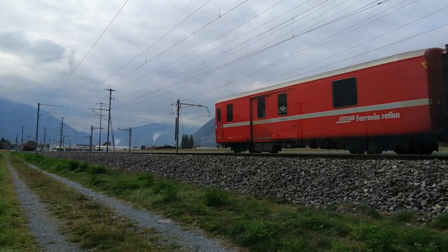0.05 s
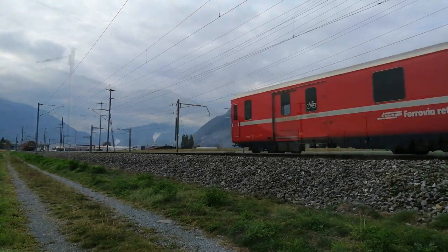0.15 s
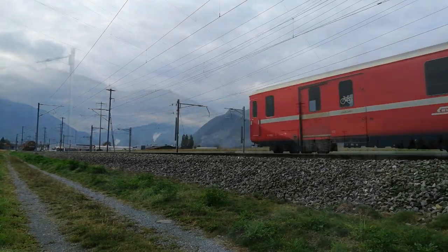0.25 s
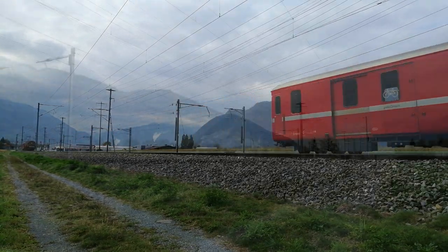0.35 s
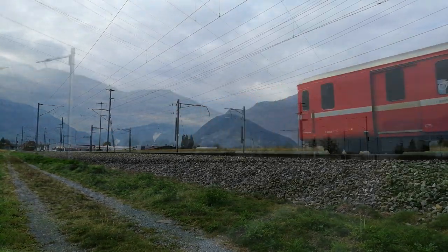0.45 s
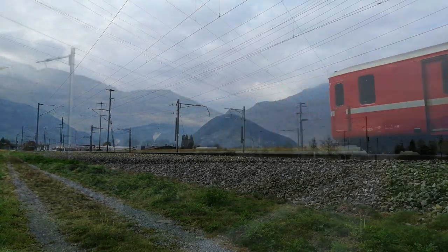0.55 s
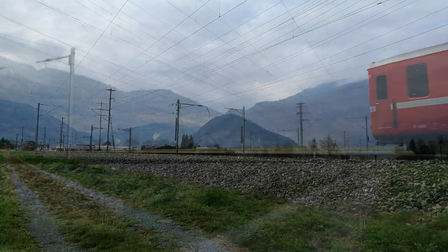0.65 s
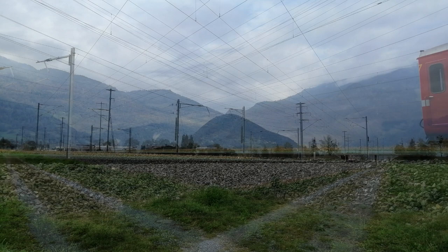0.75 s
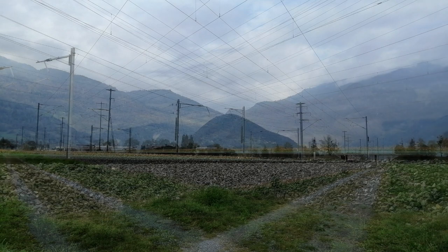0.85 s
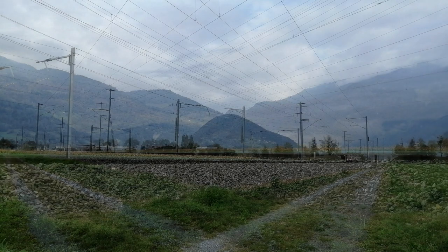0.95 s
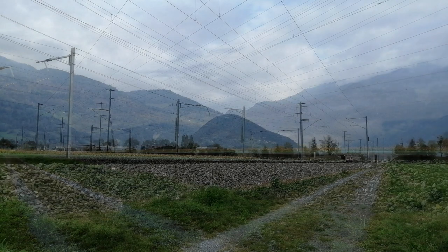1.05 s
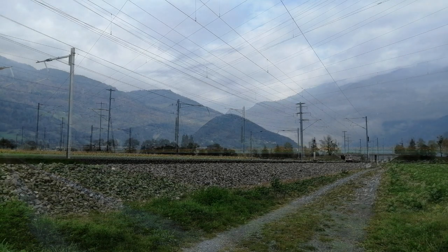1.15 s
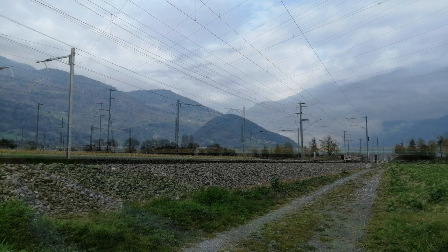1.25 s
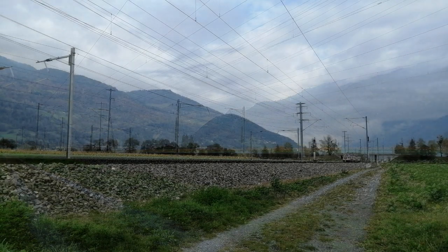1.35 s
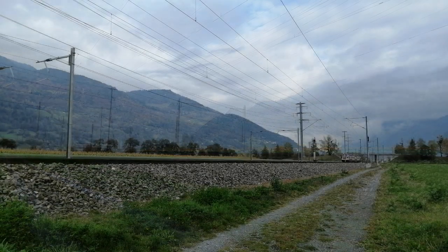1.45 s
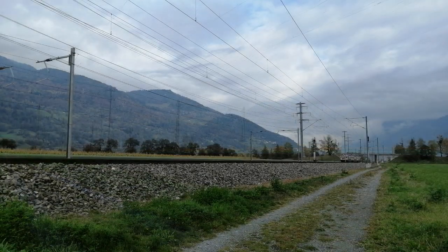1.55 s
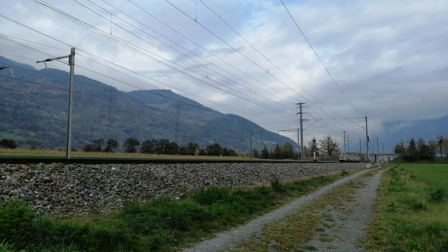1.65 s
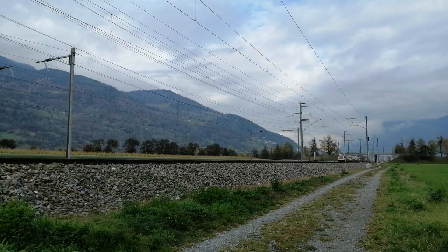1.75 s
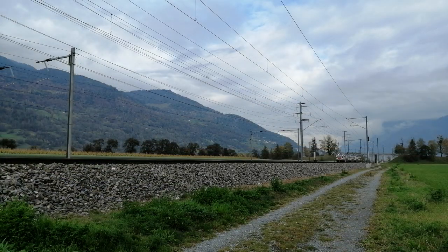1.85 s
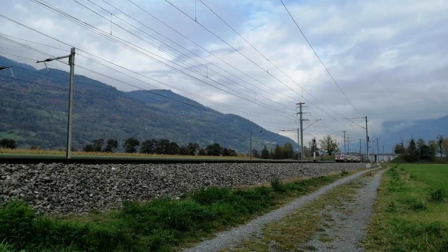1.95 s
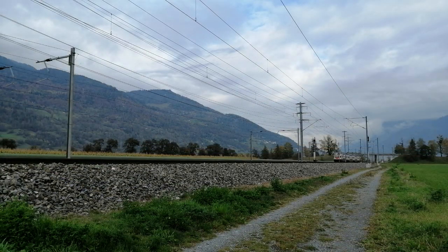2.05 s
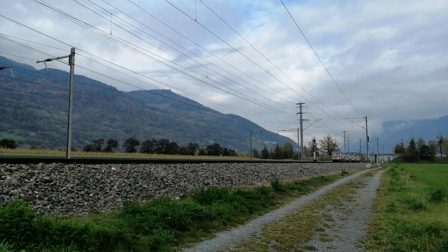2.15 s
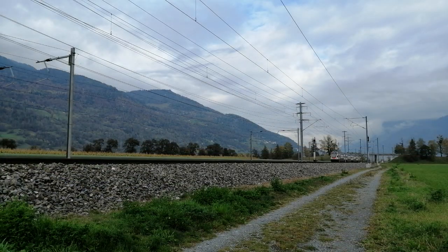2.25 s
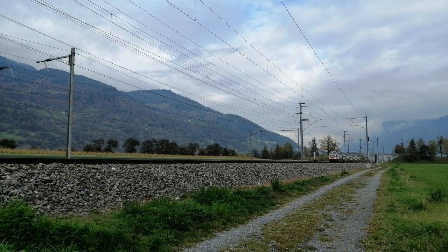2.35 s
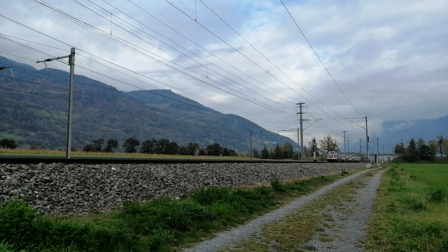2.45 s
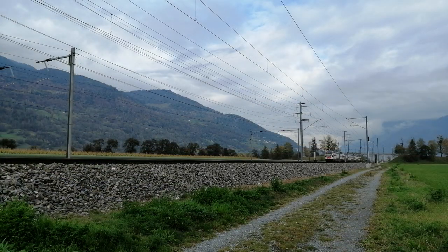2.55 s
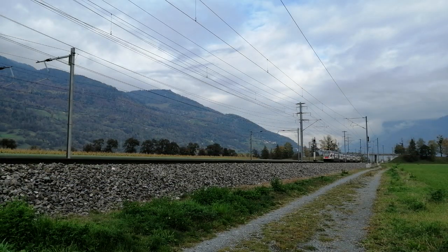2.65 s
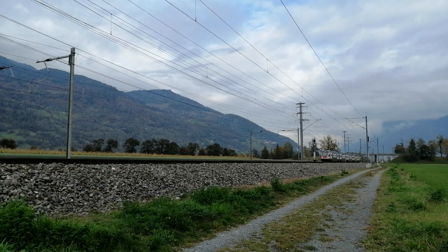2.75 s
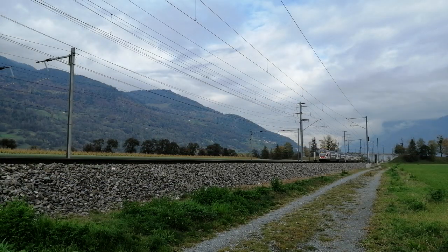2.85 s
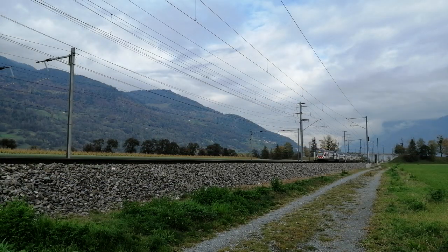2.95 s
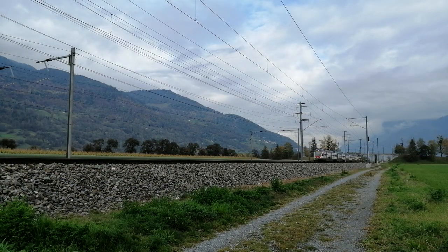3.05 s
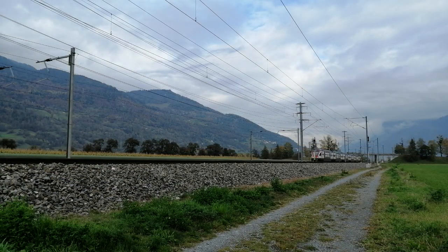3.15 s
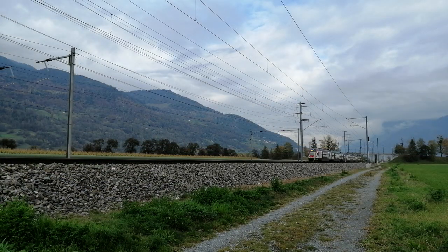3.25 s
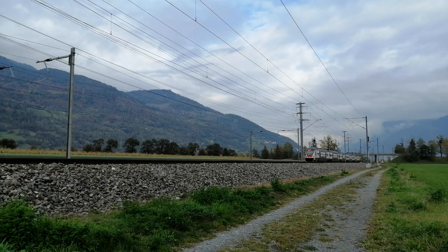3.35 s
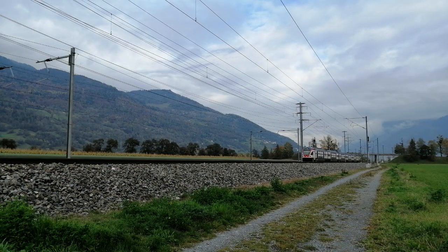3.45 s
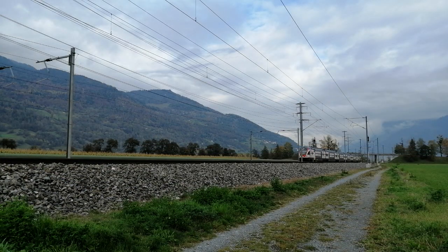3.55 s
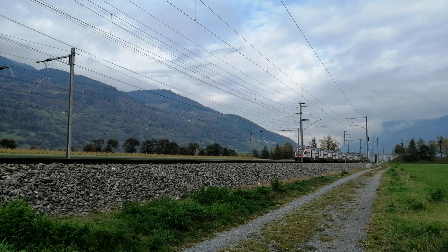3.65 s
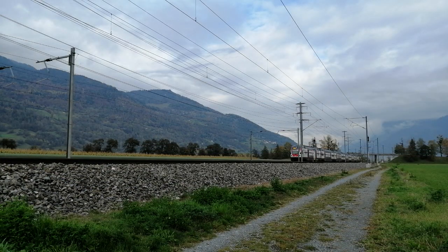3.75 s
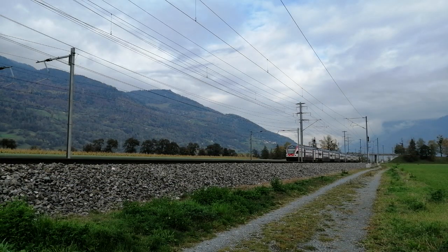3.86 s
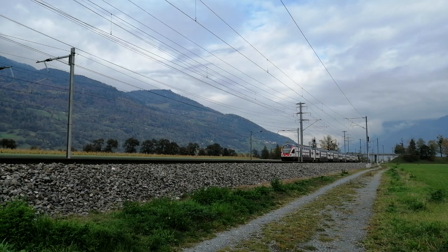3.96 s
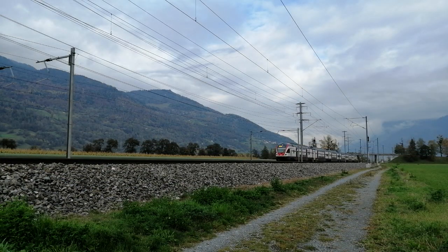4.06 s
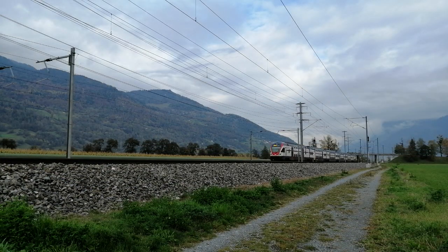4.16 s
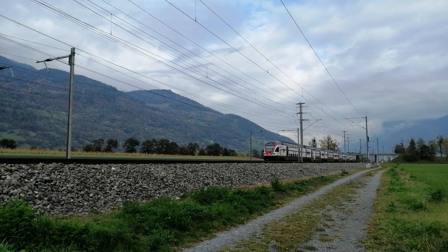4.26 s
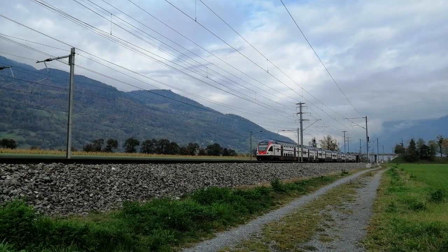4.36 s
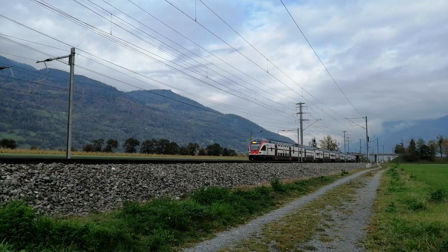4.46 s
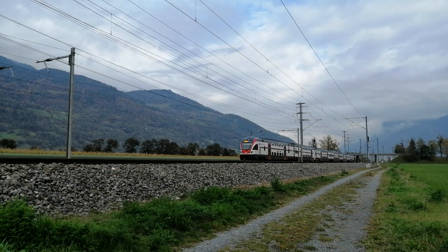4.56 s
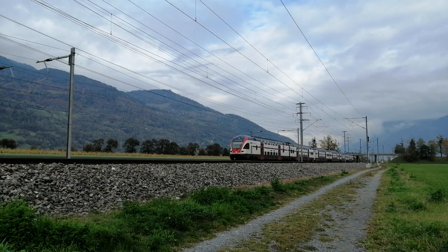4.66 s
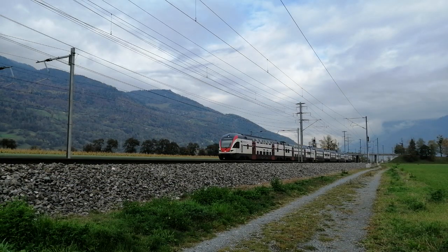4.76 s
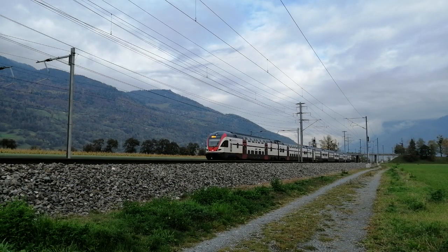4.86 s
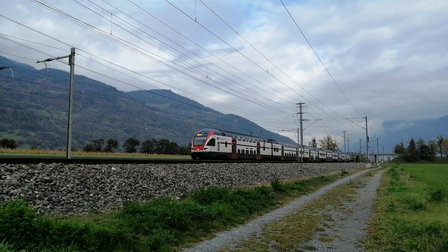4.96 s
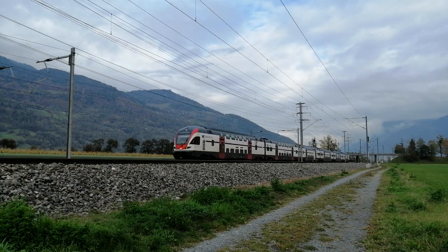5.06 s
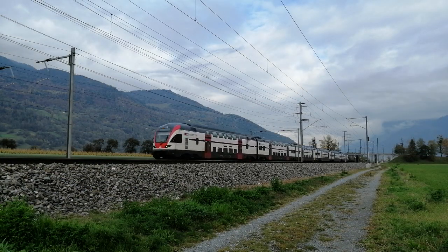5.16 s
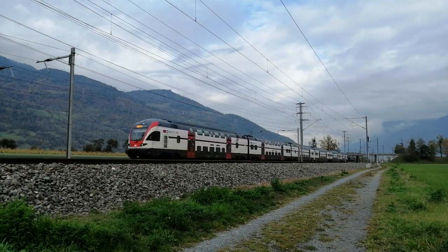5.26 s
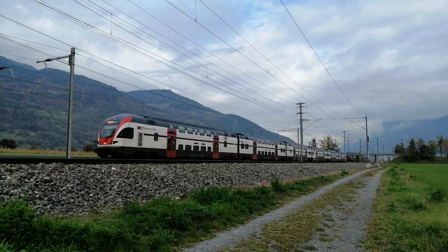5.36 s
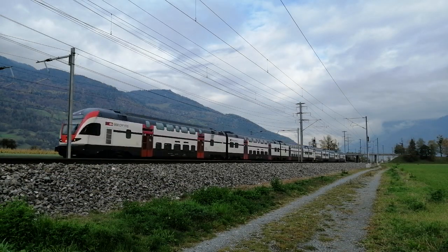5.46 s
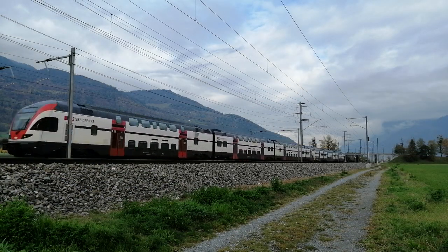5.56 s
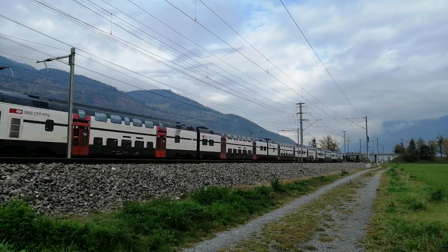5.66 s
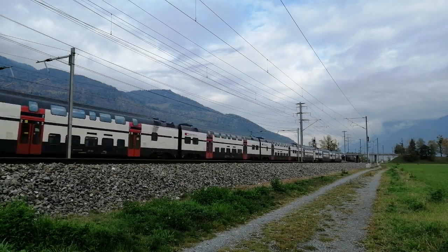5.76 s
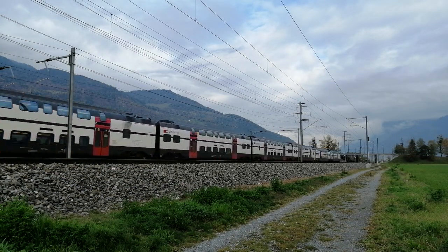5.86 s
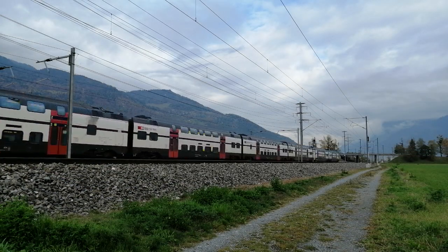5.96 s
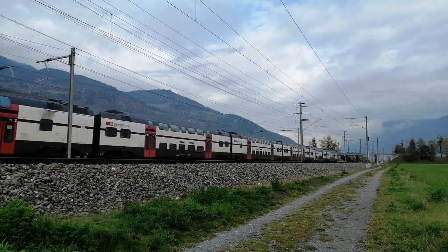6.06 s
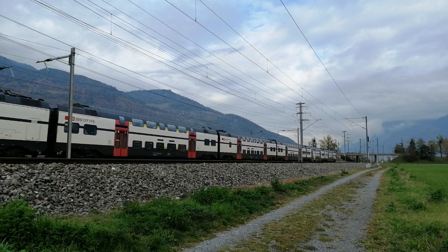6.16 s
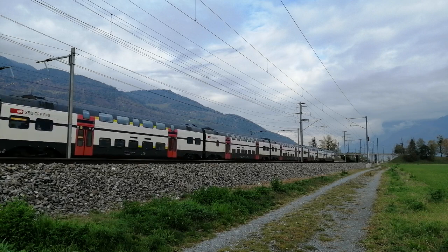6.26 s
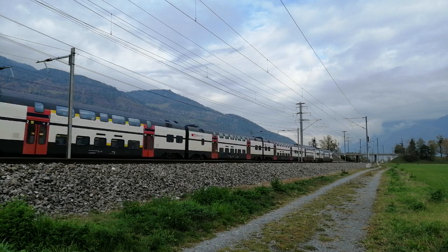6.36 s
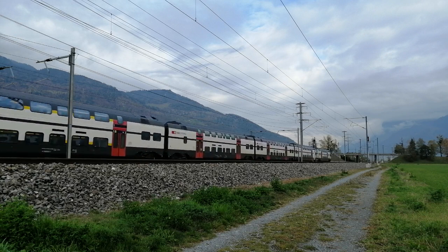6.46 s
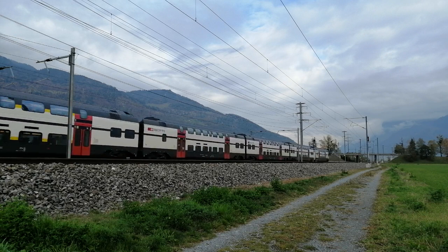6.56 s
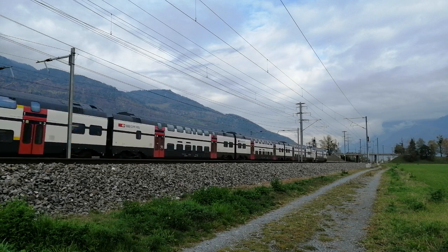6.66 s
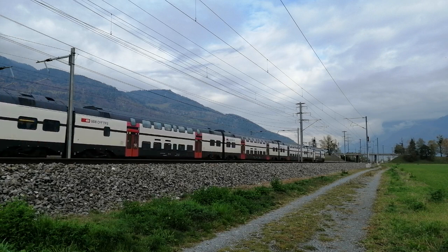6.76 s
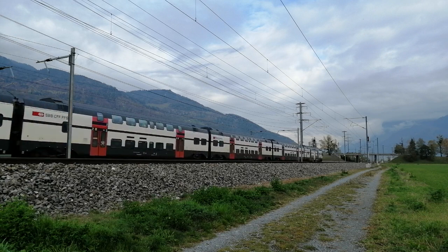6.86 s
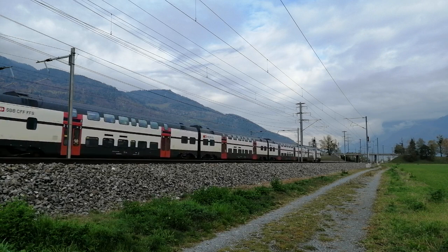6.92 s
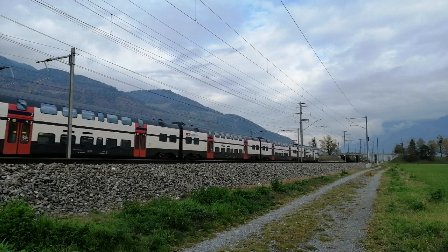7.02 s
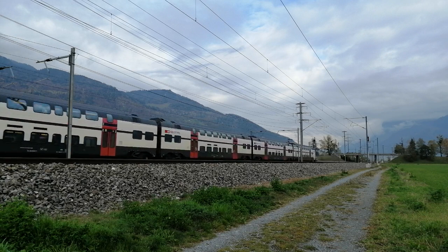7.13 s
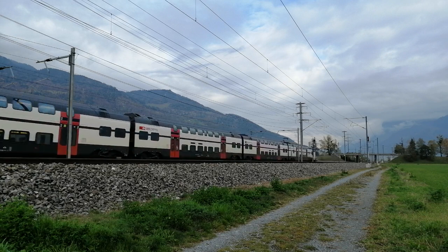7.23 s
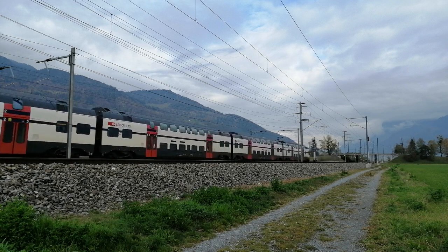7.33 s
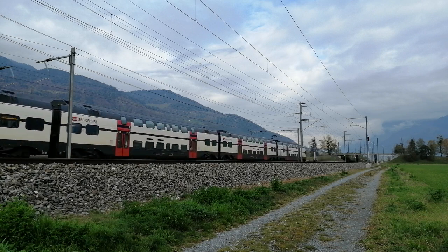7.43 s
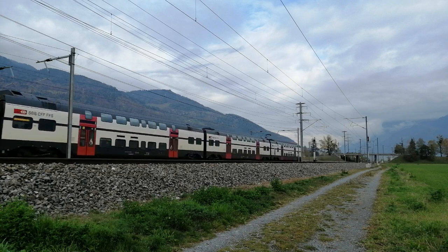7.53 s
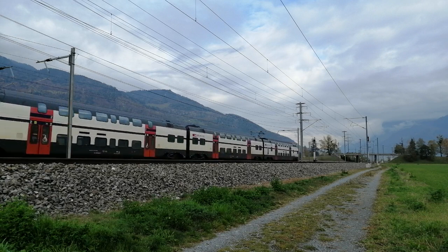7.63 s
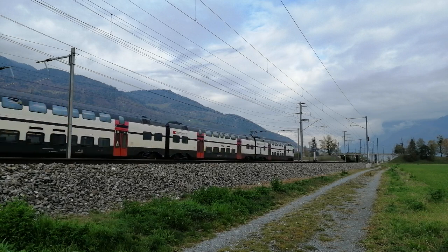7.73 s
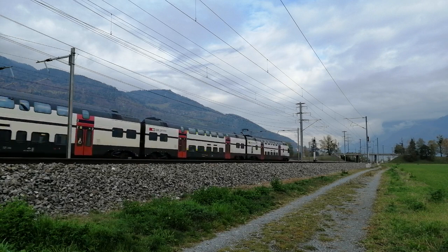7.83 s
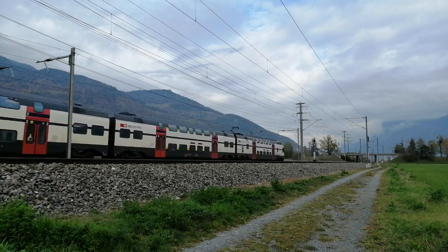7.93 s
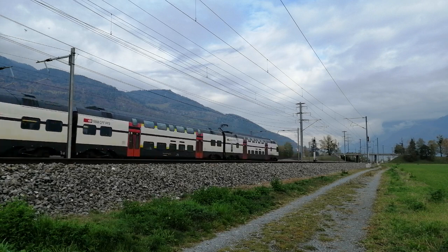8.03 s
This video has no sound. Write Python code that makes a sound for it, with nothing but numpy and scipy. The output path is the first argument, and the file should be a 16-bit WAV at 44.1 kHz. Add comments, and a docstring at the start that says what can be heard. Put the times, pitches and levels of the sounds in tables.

```python
"""Two electric trains on an open line, heard by two microphone ports at the foot of the ballast.
The tail of the first rolls off to the right and fades out; the second comes from far ahead and passes left.
Each bogie is a moving noise source with ringing wheels; drives are beamed sines that sink in pitch in passing.
Filtered noise makes rumble, valley wash, squeals, rail hiss, fan roar and pantograph sizzle; ticks are decays."""
import sys
import numpy as np
from scipy import signal
from scipy.fft import rfft, irfft, next_fast_len
from scipy.io import wavfile
from scipy.ndimage import uniform_filter1d

SR = 44100
rng = np.random.default_rng(int(sys.argv[2]) if len(sys.argv) > 2 else 0)


def master_out(mix):
    """Clip the mix to full scale and print it as 16-bit PCM to the path in sys.argv[1]."""
    frames = np.transpose(np.atleast_2d(mix))
    ceiling = np.clip(frames, -1, 1)
    pcm = np.round(ceiling * 32767).astype(np.int16)
    wavfile.write(sys.argv[1], SR, pcm)


N = 356769
T = np.arange(N) / SR
SIZE = next_fast_len(N + SR // 2, True)
HZ = np.maximum(np.fft.rfftfreq(SIZE, 1 / SR), 1)
SOUND_SPEED_M_S = 343
PORT_LAG_S = 0.00048  # between ports, for a sound from the side
TOP_HZ = 15100

# Spectra of the trains, rumble and open valley: (frequency [Hz], relative density [dB per Hz])
FIRST_COLOUR = [(240, -30), (400, -1.5), (867, -1.5), (1160, -11.5), (1410, -12.5), (1880, -14.5),
                (2290, -8.5), (2660, -12), (3770, -14.5), (4330, -23.5), (5770, -24), (11400, -38),
                (15000, -48)]
SECOND_COLOUR = [(59, -36), (100, -0.5), (162, -6.5), (330, -11.5), (367, -15.5), (482, -14.5), (962, -17),
                 (1070, -19.5), (1370, -25), (2130, -23), (4540, -34), (5840, -33.5), (8520, -40),
                 (11400, -41.5), (15000, -51.5)]
RUMBLE_COLOUR = [(8.8, -38), (15, -6.5), (38, -3), (70, 0), (104, -4), (146, -22.5), (200, -19), (260, -43),
                 (440, -120)]
VALLEY_COLOUR = [(100, -32), (270, -24), (400, -13), (750, 3.5), (1100, -2.5), (2400, 2.5), (4300, -12),
                 (5800, -13.5), (8000, -44), (15000, -34)]
# Low track boom of the first train: (frequency [Hz], gain [dB])
TRACK_BOOM = [(60, -27), (110, -12.5), (160, -14), (195, -9), (235, 5.5), (330, 9), (375, 0.5), (450, -2)]
# Near port minus far port for a sound from the side: (frequency [Hz], difference [dB])
PORT_SHADOW = [(50, 2), (120, 13), (220, 15.5), (600, 13.5), (1200, 4), (2400, 5), (5000, 4.5), (12000, 7)]
# Treble resonances of the ports: (frequency [Hz], left gain [dB], right gain [dB])
PORT_RESONANCES = [(4440, -0.5, 0), (5900, -1.5, 1), (8750, -5, -3), (9500, -5, 3), (11050, 4.5, -4),
                   (15000, -5, -10)]

# Runs: (speed [m/s], track distance [m], bearing of far approach [degrees to the right], turning sense [+1/-1])
FIRST_RUN = (22, 8, -35, 1)
SECOND_RUN = (39, 18, 20, -1)
# Bogies: (time abreast [s], relative level [dB])
FIRST_BOGIES = [(-.5, 3), (-.1, -1), (.3, 0), (.7, 0.5), (1.05, -3)]
SECOND_BOGIES = [(6.17, 2), (6.7, -3), (6.87, -4.5), (7.45, -0.5), (8.1, -1.5), (8.75, 0), (9.4, 1.5)]
# Wheel modes: (frequency [Hz], width [Hz], level over rolling noise [dB])
FIRST_WHEELS = [(1404, 240, 6.5), (2315, 64, 2), (3180, 32, 6), (3920, 73, 5), (4800, 92, 12),
                (5770, 270, 4)]
SECOND_WHEELS = [(1230, 550, 7), (2210, 110, 2), (2520, 200, 1)]

# First train, boom, roar and hiss: (low edge [Hz], high edge [Hz], level at 0 s [dB], fall [dB/s],
# flutter [dB], flutter rate [1/s])
FIRST_LAYERS = [(50, 330, -22, 4.0, 0.66, 22.1), (395, 1480, -22.5, 8, .5, 22.2),
                (1455, 16000, -26.5, 7, 0.48, 45)]
FIRST_GONE_S, FADE_OUT_S = 1.922, 0.87
# Brief surges of its boom: (time [s], rise [dB])
BOOM_SURGES = [(.225, 2.5), (.725, 5.5), (.885, 2.5)]
SURGE_WIDTH_S = 0.03
# Its singing wheels: (time abreast [s], frequency at rest [Hz], level [dB], time of beam peak [s],
# beam sharpness [-])
FIRST_WHINES = [(.62, 2305, -33, 0.51, 20), (.68, 2310, -32.5, 1.05, 1.7), (.75, 3170, -41, 0.54, 1.4),
                (0.35, 3960, -44, 1.0, 0.78), (.3, 4870, -46, 0.85, 0.79)]

# Second train, bodies, rail roar, wheel ring, hiss, air: (low edge [Hz], high edge [Hz], arrival level [dB],
# loss per doubled distance [dB], lead ahead of nose [m], change along cars [dB], swell per car [dB])
SECOND_LAYERS = [(117, 352, -36.5, 5, 24.6, -0.4, 0.1), (397, 1490, -35, 7, 21.4, -7.5, -0.2),
                 (1780, 3130, -47.5, 9, 45, 9.5, 0), (3220, 8100, -52, 7.5, 35, 5.5, 1.4),
                 (9060, 18000, -56, 11.5, 9.3, -3, 0.5)]
SETTLE_M = 48.5  # length of train over which the level settles
CAR_M, CAR_SWELL_S = 25, 5.79  # car length, time of one swell
# Its drive: tones at rest; nose and the two driven bogies when abreast
GEAR_HZ, MOTOR_HZ, FAN_HZ = 1002, 2250, 303
NOSE_S, DRIVE_S, TRAIL_S = 6.17, 6.6, 6.72
# Beams of gears, motors, fans, motor hums and body hums: (time abreast [s], frequency at rest [Hz],
# level [dB], time of beam peak [s], beam sharpness [-])
DRIVE_WHINES = [(DRIVE_S, GEAR_HZ, -56, 2.63, 4.1), (DRIVE_S, GEAR_HZ, -52, 3.63, 3.5),
                (DRIVE_S, GEAR_HZ, -48.5, 4.7, 3), (NOSE_S, 988, -31, 5.66, 110),
                (6.5, GEAR_HZ, -31.5, 5.96, 32), (DRIVE_S, GEAR_HZ, -34.5, 6.33, 8.7),
                (DRIVE_S, 1025, -37, 6.8, 22), (DRIVE_S, GEAR_HZ, -42, 7.3, 20),
                (DRIVE_S, GEAR_HZ, -40, 7.97, 4), (NOSE_S, 2265, -37, 5.56, 15),
                (NOSE_S, MOTOR_HZ, -41, 6.2, 33), (DRIVE_S, MOTOR_HZ, -35.5, 5.97, 12),
                (DRIVE_S, MOTOR_HZ, -36, 6.36, 63), (DRIVE_S, 2275, -34.5, 6.57, 35),
                (TRAIL_S, 2235, -30, 6.86, 47), (TRAIL_S, MOTOR_HZ, -33, 7.12, 21),
                (TRAIL_S, MOTOR_HZ, -45, 7.85, 3), (DRIVE_S, FAN_HZ, -36, 6.58, 14),
                (7.7, FAN_HZ, -26.5, 7.02, 23), (8.3, FAN_HZ, -34, 7.72, 110),
                (NOSE_S, 460, -44.5, 5.84, 1.44), (TRAIL_S, 440, -47, 6.75, 9.1),
                (DRIVE_S, 690, -46, 6.3, 3), (NOSE_S, 236, -47, 4.74, 0.78), (NOSE_S, 195, -43, 5.37, 2.7),
                (NOSE_S, 137, -48.5, 3.85, 1)]

# Air and ground rumble: level alongside, loss per doubled distance, lead ahead of nose, level with no train near
RUMBLE_DB, RUMBLE_LOSS_DB, RUMBLE_LEAD_M, STILL_DB = -26, 4.5, 11, -46.5
# Buffets of air: (time [s], rise over rumble [dB])
BUFFETS = [(3.86, 4.5), (4.66, 4.5), (5.315, 9), (6.37, 3.5), (6.82, 5)]
BUFFET_WIDTH_S = 0.029
# Faint ticks close by: (time [s], level before filtering [dB], decay [s])
TICKS = [(2.641, -63, .004), (2.828, -69, .004), (3.027, -67, .004), (3.292, -67, .004),
         (3.312, -55.5, .005), (4.297, -56, .012)]
# Rail hiss, flange squeals and fan roar, levels before the left/right tilt or roughness:
# (time [s], frequency [Hz], width [Hz], level [dB], half length [s])
HISSES = [(3.27, 2100, 1400, -58, .06), (3.27, 5600, 2200, -68, .1), (3.79, 2500, 1600, -56.5, 0.065),
          (3.7, 6000, 1300, -69.5, .45), (3.9, 9000, 3500, -76, .3), (4.12, 1996, 1197, -55.5, 0.21),
          (4.284, 5900, 2400, -65, 0.046), (4.6, 4900, 2600, -63, 0.11), (4.695, 1348, 499.6, -49, 0.47),
          (5.0, 6200, 4500, -54, .14), (5.17, 3100, 1200, -54, 0.076), (5.78, 6980, 4490, -53.5, .14),
          (7.48, 10500, 3000, -54, .04)]
SQUEALS = [(5.9, 2450, 300, -51, .15), (6.376, 2370, 220.3, -44, .07), (6.38, 3550, 450, -50, .08),
           (6.57, 2624, 351.4, -42, 0.12), (6.865, 2160, 120.2, -40, .09), (7.199, 2610, 300, -40.5, 0.17),
           (7.171, 3220, 260, -47, .12), (7.61, 2425, 180, -41.5, 0.096), (7.59, 3380, 899, -45, .075),
           (7.847, 2594, 120.6, -39, .05), (7.847, 3200, 262, -50, .1)]
FAN_ROARS = [(6.63, 298, 60, -37.5, 0.15), (7.05, 315, 60, -41, .12)]
SIZZLE_S, SIZZLE_HALF_S, SIZZLE_DB = 6.46, 0.12, -46.5  # pantograph: middle, half length, level


def undb(db):
    """Decibels to amplitude gain."""
    return 10 ** (np.asarray(db) / 20)


def colour(points, hz=HZ, axis=1):
    """Gain of a (Hz, dB) table, interpolated on log frequency."""
    points = np.array(points)
    return undb(np.interp(np.log(hz), np.log(points[:, 0]), points[:, axis]))


def filtered(x, gain):
    """Apply a gain per frequency."""
    return irfft(rfft(x, SIZE) * gain, SIZE)[..., :N]


def band(lo_hz, hi_hz):
    """Steep band-pass gain."""
    return 1 / np.sqrt((1 + (lo_hz / HZ) ** 12) * (1 + (HZ / hi_hz) ** 12))


def level(x, db):
    """Divide out the 1/3 s RMS of the port mean, then set the level to db."""
    power = uniform_filter1d(x.mean(axis=0) ** 2, SR // 3)
    return x * undb(db) / np.sqrt(power + 1e-18)


def walk(rate_per_s):
    """Smooth chance with a spread near 1."""
    knots = rng.standard_normal(65536)
    return 1.493 * np.interp(T * rate_per_s, np.arange(len(knots)), knots)


def bumps(table, width_s):
    """Short Gaussian rise in dB at each (s, dB) row."""
    return sum(db * np.exp(-((T - s) / width_s) ** 2) for s, db in table)


def burst(s, hz, width_hz, db, half_s, sink_per_s=0):
    """Swell of narrow noise, different at each port, whose pitch may sink."""
    phase = 2 * np.pi * hz * (T - sink_per_s * (T - s) ** 2 / 2)
    along = np.array([walk(width_hz), walk(width_hz)])
    across = np.array([walk(width_hz), walk(width_hz)])
    swell = undb(db) * np.exp(-((T - s) / half_s) ** 2 / 2)
    return swell * (along * np.sin(phase) + across * np.cos(phase))


def left_tilt(left_db):
    """Port gains, left over right by left_db."""
    return undb(np.array([[left_db], [-left_db]]) / 2)


def path(run, abreast_s):
    """Point on a train: emission time of the sound at each port, nearness, side (+1 right)."""
    speed_m_s, gap_m, bearing_deg, sense = run
    along_m = speed_m_s * (T - abreast_s)
    range_m = np.hypot(along_m, gap_m)
    azimuth = np.radians(bearing_deg) + np.sign(sense) * np.arctan2(gap_m, -along_m)
    side = np.sin(np.clip(azimuth, -np.pi / 2, np.pi / 2))
    port_offset_s = np.outer([-1, 1], side) * PORT_LAG_S / 2
    return T - range_m / SOUND_SPEED_M_S + port_offset_s, gap_m / range_m, side


def shadowed(x, side):
    """The port turned away hears less, most of all in the low middle."""
    hz, s, frames = signal.stft(x, SR, nperseg=512)
    tilt = colour(PORT_SHADOW, hz + 1)[:, None] ** (np.interp(s, T, side) / 2)
    return signal.istft(frames * np.array([1 / tilt, tilt]), SR)[1][:, :N]


def rolling(run, bogies, wheels, scatter_db, treble_db=3):
    """Rough rails shake each bogie and ring its wheels; travel time gives Doppler shift and direction."""
    modes = sum(undb(db) ** 2 / (1 + (2 * (HZ - hz) / width_hz) ** 2) for hz, width_hz, db in wheels)
    ring = np.sqrt(1 + modes)
    out, power, lean = 0, 0, 0
    for abreast_s, db in bogies:
        left_at_s, near, side = path(run, abreast_s)
        noise = irfft(rfft(rng.standard_normal(SIZE)) * ring, SIZE)
        gain = near * undb(db)
        heard = np.array([np.interp(at_s * SR % SIZE, np.arange(SIZE), noise) for at_s in left_at_s])
        out = out + gain * heard
        power = power + gain ** 2
        lean = lean + side * gain ** 2
    # ballast and fields scatter sound, unrelated at the two ports, the treble most
    spread = colour([(100, -19.0), (1200, -6.0), (5000, treble_db)])
    scatter = filtered(rng.standard_normal((2, N)), spread)
    return shadowed(out / np.sqrt(power) + undb(scatter_db) * scatter, lean / power)


def whines(run, table, echo_far=0.2, echo_near=0.83, waver_db=1.5, wander_hz=1):
    """Motor, gear and wheel tones sink in pitch as they pass, each beamed towards the ports for a while."""
    # moving air makes pitch and level waver; wander_hz is the spread of a tone at GEAR_HZ
    drift_s = np.cumsum(wander_hz * walk(18)) / GEAR_HZ / SR
    out = 0
    for abreast_s, hz, db, loudest_s, sharpness in table:
        left_at_s, near, side = path(run, abreast_s)
        beam = (1 + ((T - loudest_s) / .5) ** 2) ** (-sharpness / 2)
        ports = colour(PORT_SHADOW, hz) ** (np.outer([-1, 1], side) / 2)
        # close by, echoes off ballast and car bodies roughen the line, differently at each port
        echo = echo_far + (echo_near - echo_far) * near
        smear_hz = 12 + hz / 22
        along = echo * np.array([walk(smear_hz), walk(smear_hz)]) / 2
        across = echo * np.array([walk(smear_hz), walk(smear_hz)]) / 2
        phase = 2 * np.pi * hz * (left_at_s + drift_s)
        gain = ports * beam * undb(db + waver_db * walk(11))
        out = out + gain * ((1 - echo / 2 + along) * np.sin(phase) + across * np.cos(phase))
    return out


def approach(db, loss_db, lead_m, change_db=0):
    """Second-train level in dB: rises as the nose nears, settles exponentially along the cars."""
    speed_m_s, gap_m = SECOND_RUN[:2]
    past_m = speed_m_s * (T - NOSE_S) + lead_m
    doublings = np.log2(np.hypot(np.minimum(past_m, 0), gap_m) / gap_m)
    settled = 1 - np.exp(-np.maximum(past_m, 0) / SETTLE_M)
    return db - loss_db * doublings + change_db * settled


def first_train():
    """Coaches boom on the track, roar and hiss, wheels sing; the boom surges and falls slowest in the fade."""
    wheels = rolling(FIRST_RUN, FIRST_BOGIES, FIRST_WHEELS, scatter_db=0.5)
    tone = colour(FIRST_COLOUR, np.maximum(HZ, 450)) * colour(TRACK_BOOM)
    layers = []
    for lo_hz, hi_hz, db, fall_db_per_s, flutter_db, rate_per_s in FIRST_LAYERS:
        level_db = db - fall_db_per_s * T + flutter_db * walk(rate_per_s)
        layers.append(level(filtered(wheels, tone * band(lo_hz, hi_hz)), level_db))
    boom, roar, hiss = layers
    boom = boom * undb(bumps(BOOM_SURGES, SURGE_WIDTH_S))
    ringing = whines(FIRST_RUN, FIRST_WHINES, echo_far=1.2, echo_near=1.33)
    fade_out = np.clip((FIRST_GONE_S - T) / FADE_OUT_S, 0, 1)
    return (boom + roar + hiss + ringing) * fade_out


def rumble(fade_in, apart_db=-14, far_top_hz=75, near_top_hz=125, gust_db=0.88):
    """Air and ground rumble, nearly alike at both ports; opens up and leans left as the train comes alongside."""
    noise = rng.standard_normal(N) + undb(apart_db) * rng.standard_normal((2, N))
    lean_db = np.interp(T, [1, 2, 4.8, 6.4], [-1.5, 0.5, -1.5, 7.0])  # left over right
    far = filtered(noise, colour(RUMBLE_COLOUR) * band(12, far_top_hz))
    near = filtered(noise, colour(RUMBLE_COLOUR) * band(12, near_top_hz))
    low = far + (near - far) * np.interp(T, [1.5, 4, 5.4], [.03, .35, 1])
    swell_db = STILL_DB + fade_in * (approach(RUMBLE_DB, RUMBLE_LOSS_DB, RUMBLE_LEAD_M) - STILL_DB)
    buffets_db = bumps(BUFFETS, BUFFET_WIDTH_S)
    leaning = low * undb(np.outer([1, -1], lean_db) / 2)
    return level(leaning, swell_db + buffets_db + gust_db * walk(9))


def second_train(flutter_db=0.75, swell_from_s=4.7):
    """Bodies, rails, wheels, hiss and rushing air fill their own bands; close by, the hiss swells with each car."""
    wheels = rolling(SECOND_RUN, SECOND_BOGIES, SECOND_WHEELS, scatter_db=-2.0)
    tone = colour(SECOND_COLOUR)
    cars = np.cos(2 * np.pi * (T - CAR_SWELL_S) * SECOND_RUN[0] / CAR_M) * np.clip(T - swell_from_s, 0, 1)
    out = 0
    for lo_hz, hi_hz, db, loss_db, lead_m, change_db, swell_db in SECOND_LAYERS:
        level_db = approach(db, loss_db, lead_m, change_db) + swell_db * cars + flutter_db * walk(35)
        out = out + level(filtered(wheels, tone * band(lo_hz, hi_hz)), level_db)
    return out


def valley(db=-59, spread_db=-2):
    """Steady far wash, mostly from ahead and to the left: the right port lags."""
    wash = rng.standard_normal(N)
    ports = np.array([wash, np.roll(wash, int(PORT_LAG_S * SR / 2))])
    diffuse = filtered(rng.standard_normal((2, N)), HZ / (HZ + 500))
    return level(filtered(ports + undb(spread_db) * diffuse, colour(VALLEY_COLOUR)), db)


def ticks(body_db=0, bright_db=6):
    """Tiny bright ticks near the ports: decaying noise, each with a duller body."""
    envelope = sum(undb(db) * (T >= s) * np.exp(-np.abs(T - s) / decay_s) for s, db, decay_s in TICKS)
    snap = envelope * rng.standard_normal((2, N))
    return filtered(snap, undb(bright_db) * band(11000, 12000) + undb(body_db) * band(1500, 9400))


def hisses(rough_db=1.5, rough_per_s=28):
    """Rails hiss in rough surges as the second train runs over them."""
    return sum(burst(*row) for row in HISSES) * undb(rough_db * walk(rough_per_s))


def squeals(left_db=4):
    """Flanges rub the rail in rough bursts that sink in pitch as the wheels go by on the left."""
    return left_tilt(left_db) * sum(burst(*row, sink_per_s=.14) for row in SQUEALS)


def pantograph(crackle_db=3):
    """The carbon strip slides along the contact wire with a brief, very high sizzle."""
    sizzle = filtered(rng.standard_normal((2, N)) * undb(crackle_db * walk(400)), band(10200, 16000))
    return level(sizzle, SIZZLE_DB) / (1 + np.abs((T - SIZZLE_S) / SIZZLE_HALF_S) ** 6)


def fans(left_db=9):
    """Cooling fans push out rough air: a short, low roar around the fan tones, passing on the left."""
    return left_tilt(left_db) * sum(burst(*row, sink_per_s=.14) for row in FAN_ROARS)


def scene():
    """The second train and the valley fade in under the tail of the first."""
    fade_in = np.clip((T - 1.0) / 0.66, 0, 1)
    drive = whines(SECOND_RUN, DRIVE_WHINES, echo_far=.3, echo_near=.85, waver_db=1.7, wander_hz=1)
    second = second_train() + drive + fans() + squeals() + hisses()
    return first_train() + fade_in * (second + valley()) + pantograph() + rumble(fade_in) + ticks()


def record(dry):
    """The ports colour the treble; a steep low-pass cuts the top."""
    ports = np.array([colour(PORT_RESONANCES, axis=1), colour(PORT_RESONANCES, axis=2)])
    heard = filtered(dry, ports)
    return signal.sosfilt(signal.ellip(10, .2, 80, TOP_HZ, fs=SR, output="sos"), heard)


dry = scene()
out = record(dry)
master_out(out)
```